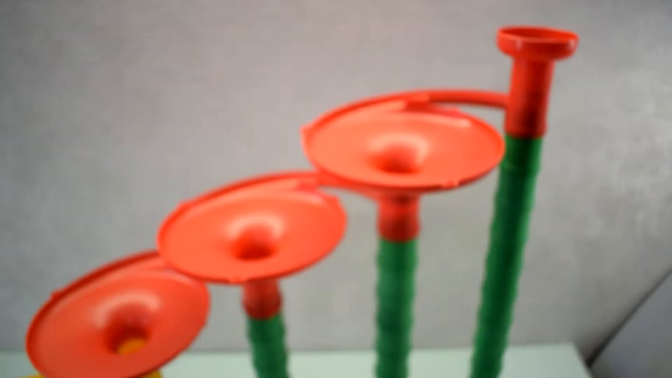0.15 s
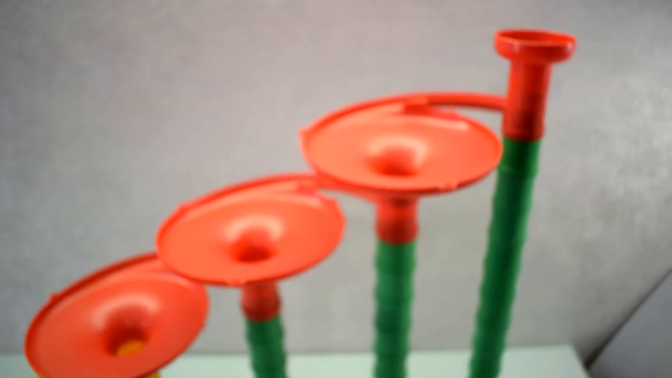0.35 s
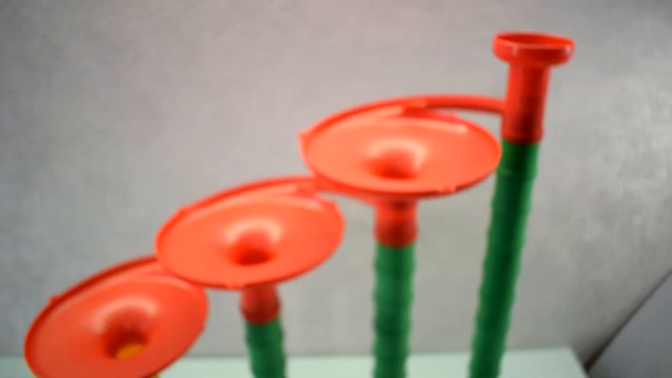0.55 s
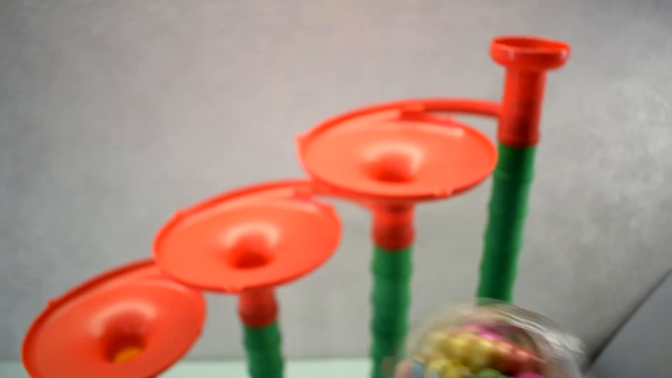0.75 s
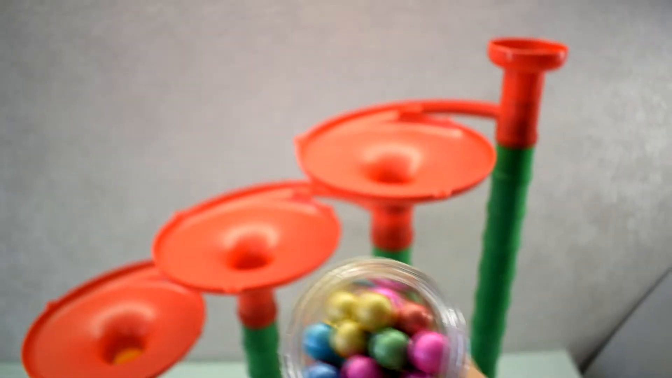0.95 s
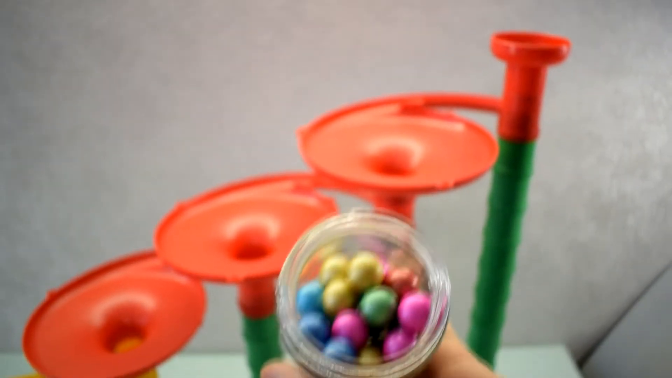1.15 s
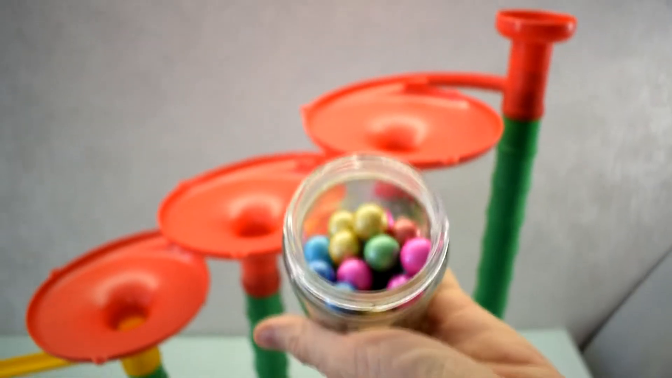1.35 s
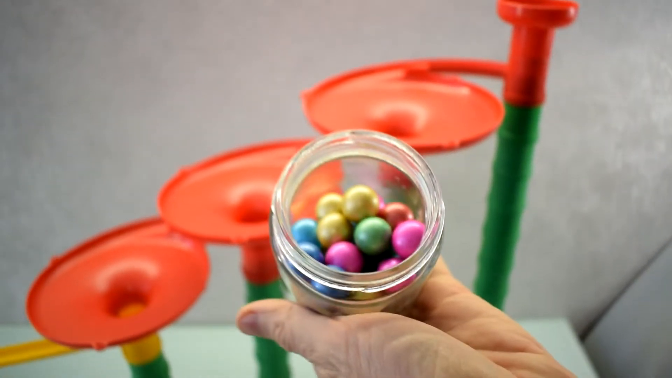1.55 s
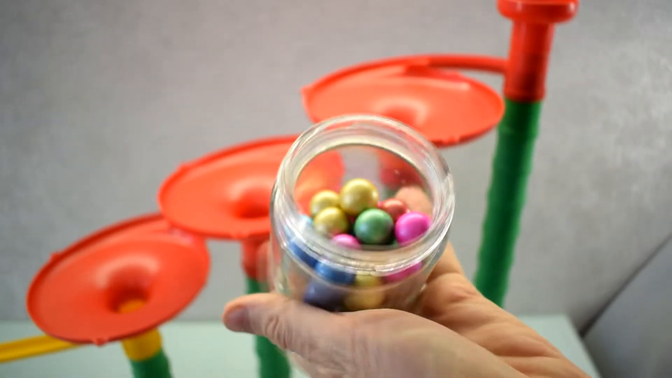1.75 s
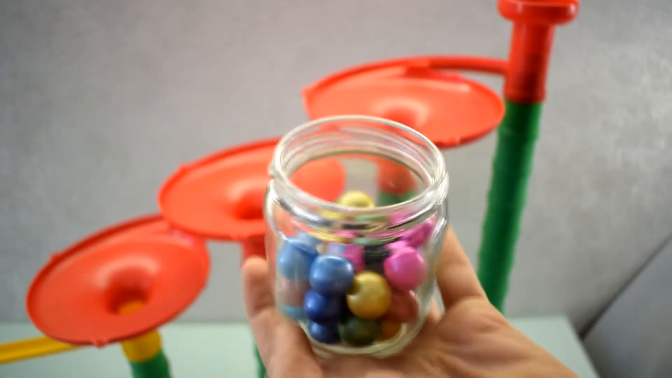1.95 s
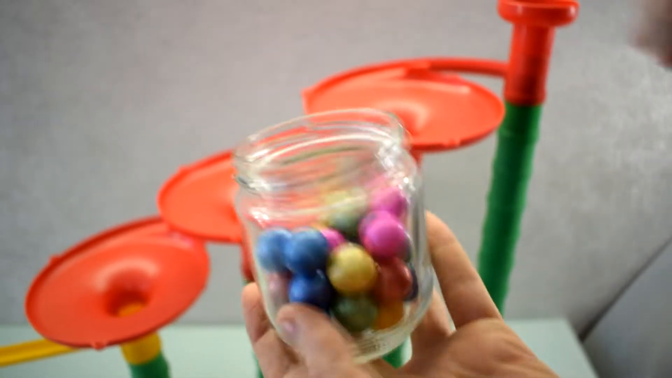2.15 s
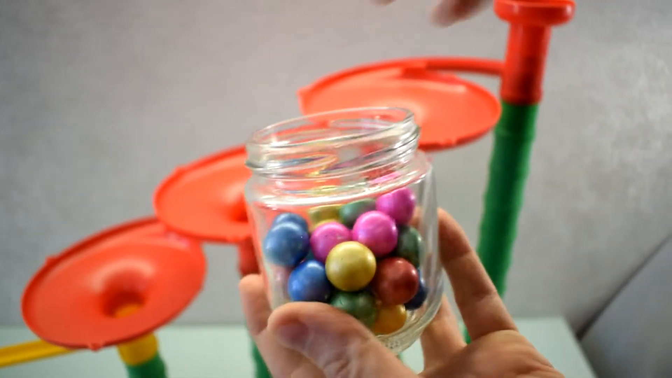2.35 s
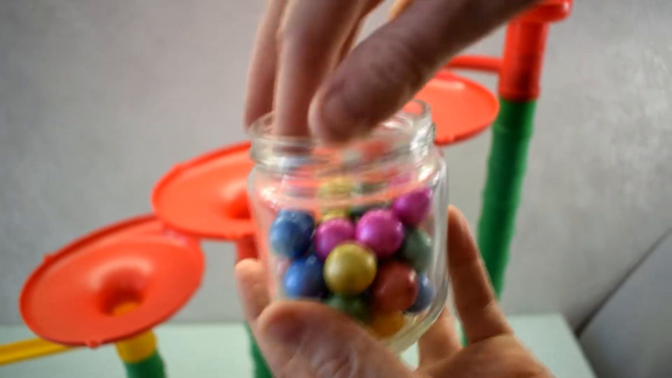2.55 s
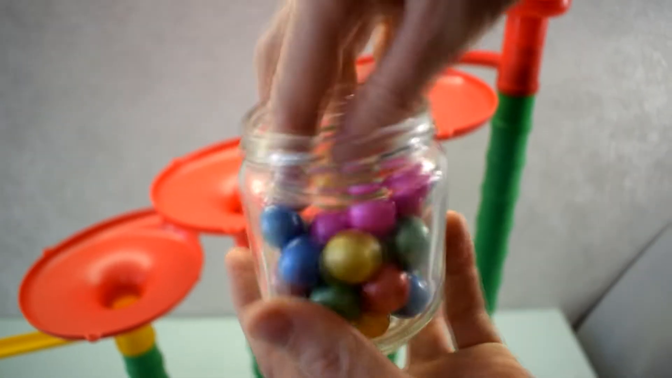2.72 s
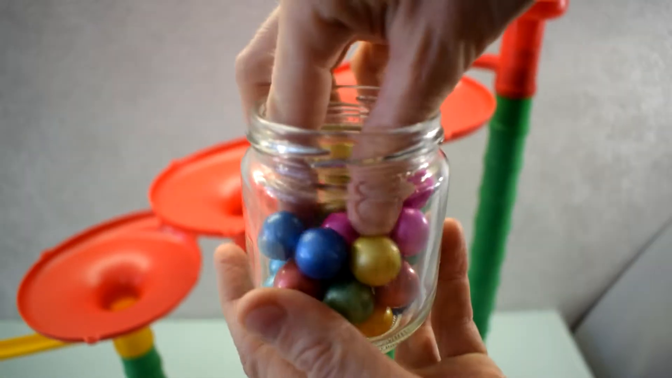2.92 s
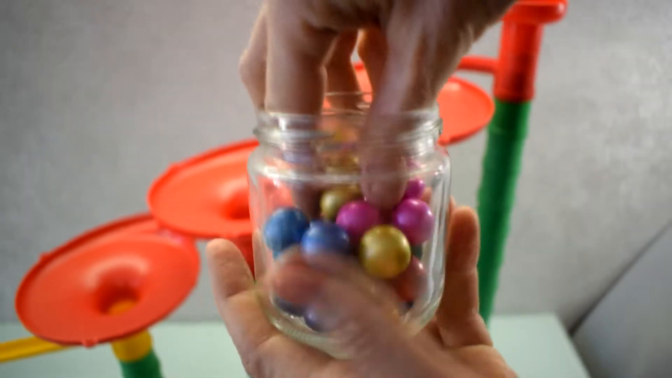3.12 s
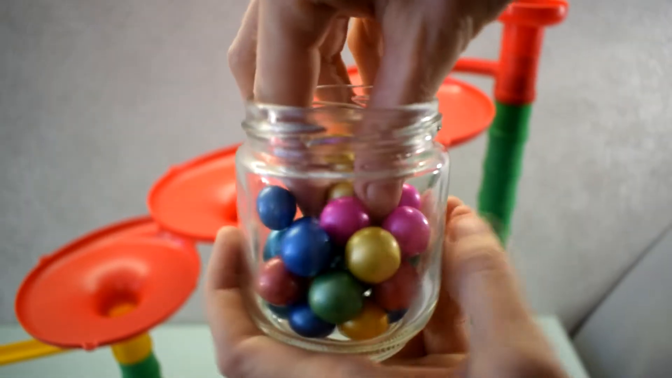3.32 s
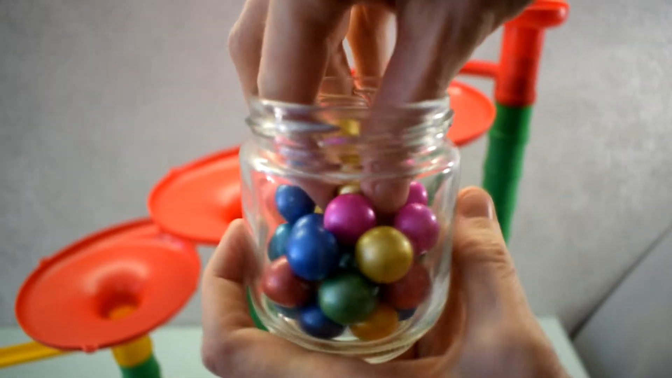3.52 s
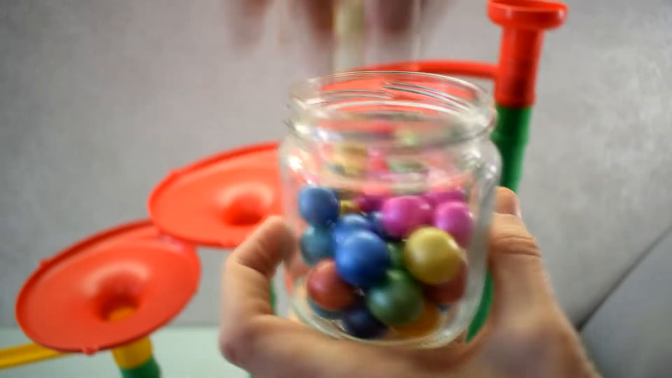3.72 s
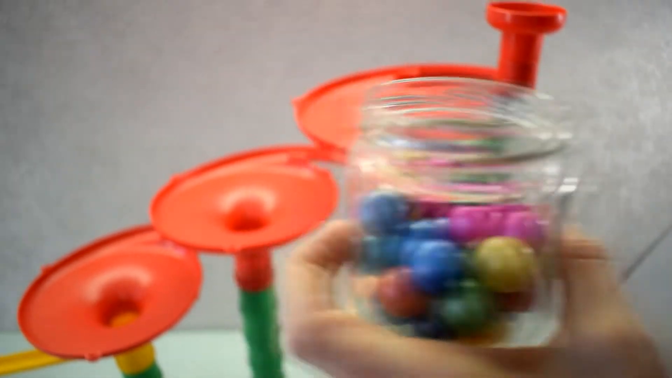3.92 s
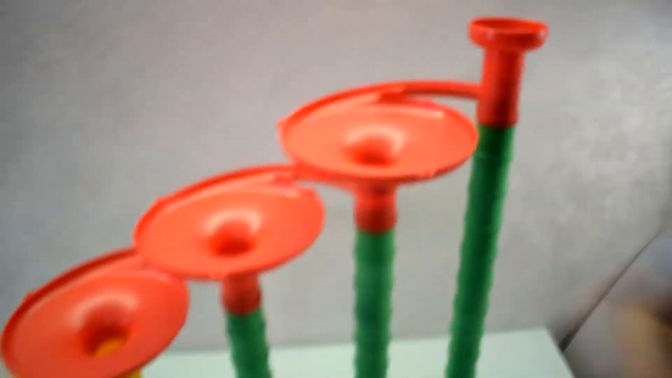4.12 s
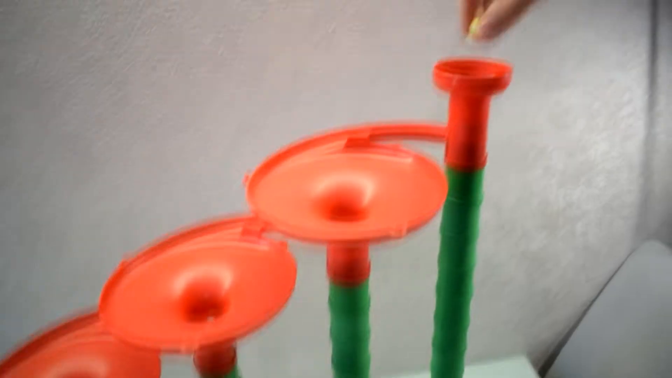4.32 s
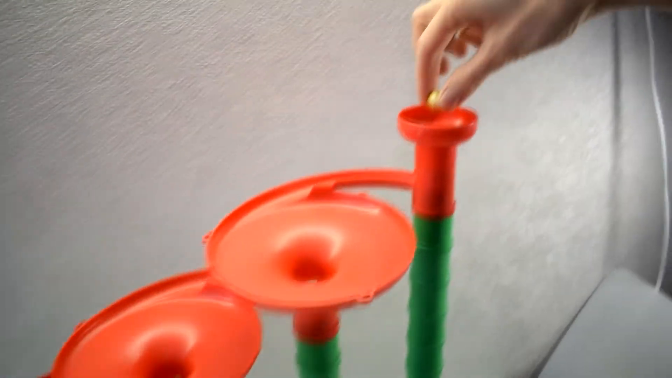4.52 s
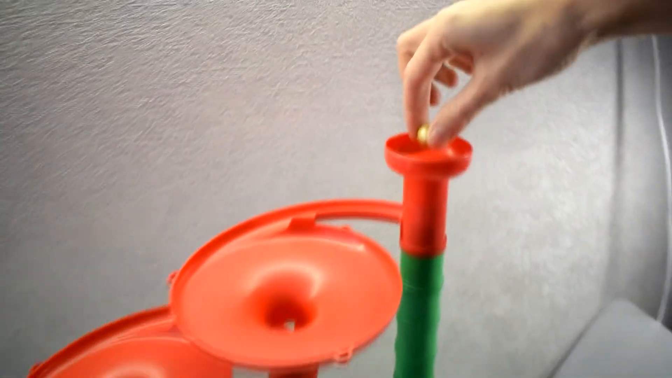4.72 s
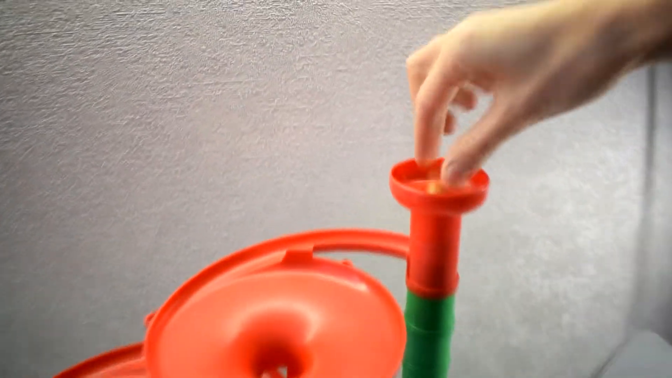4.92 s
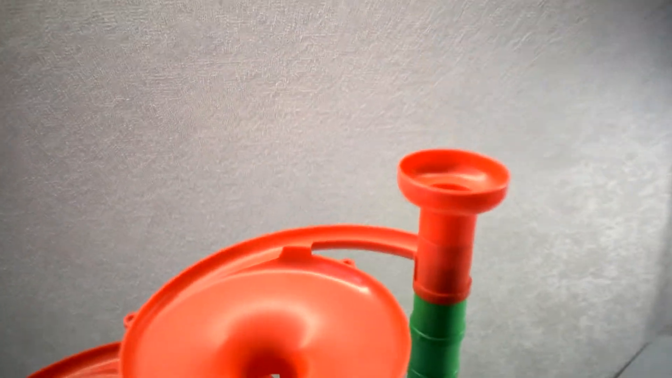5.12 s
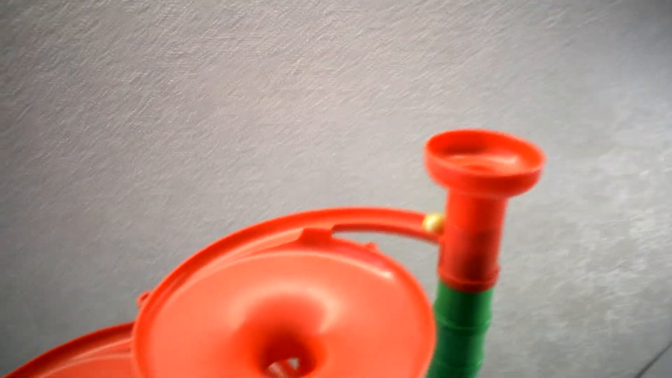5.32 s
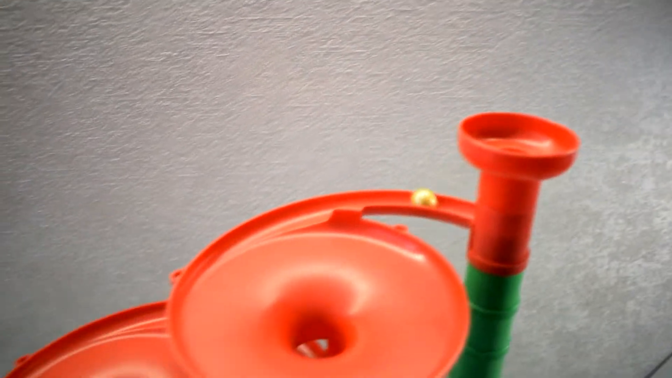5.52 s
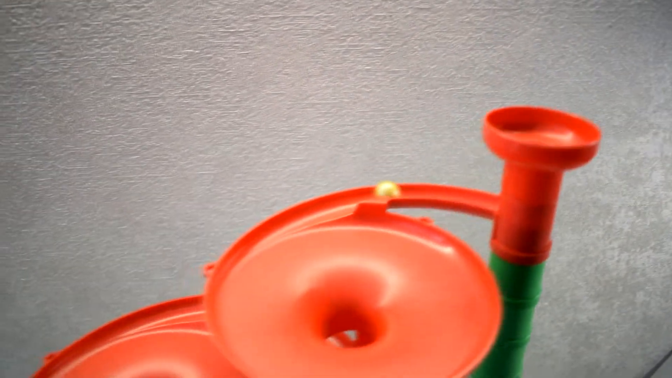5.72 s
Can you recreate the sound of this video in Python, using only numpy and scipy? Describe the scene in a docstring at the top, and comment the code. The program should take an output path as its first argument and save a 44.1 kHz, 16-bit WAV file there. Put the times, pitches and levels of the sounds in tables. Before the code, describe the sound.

Faint room hush, then barely audible marble ticks before a sharp glassy rattle and a louder, denser one as fingers dig in. Irregular clinks continue, then it falls nearly silent with tiny scuffs and cloth rustle. A marble lands in a hollow plastic tower with a loud clack and quick bounces, then rolls quietly and faster. Close stereo microphone, short room echo.

```python
"""Over the steady hush of a small quiet room, filtered noise, a hand lifts a glass jar of marbles and rummages.
The marbles click (noise bursts), ring the glass and sound the air in the jar (damped modes); a funnel hums along.
Dry ticks, a scuff of skin on glass and the brush of a sleeve follow, as noise and impulses shaped by filters.
The chosen marble drops down a plastic tower with a clack (noise bursts and modes of the plastic),
then rolls out along the ramp towards the first funnel: random bumps that excite the resonances of the ramp."""
import sys
import numpy as np
from scipy import signal
from scipy.fft import rfft, irfft, next_fast_len
from scipy.io import wavfile

SR = 44100
rng = np.random.default_rng(int(sys.argv[2]) if len(sys.argv) > 2 else 0)


def materialize(psi):
    """Save the field psi as 16-bit PCM at rate SR to the path in sys.argv[1].

    A 1-D psi becomes a single channel; in a 2-D psi each row is a channel.
    """
    bounded = np.clip(np.atleast_2d(psi).T, -1, 1)
    quanta = np.round(bounded * 32767).astype(np.int16)
    wavfile.write(sys.argv[1], SR, quanta)


N = 254456
TOP_HZ = 15300  # upper edge of the output
TIME = np.arange(N) / SR
RING_TIME = TIME[:SR * 2 // 3]
CRACK_TIME = TIME[:4096]


def undb(db):
    """Amplitude ratio: 20 dB is a factor of ten."""
    return 10 ** (np.asarray(db) / 20)


def unit(x):
    """Normalisation of effective value: rms 1."""
    return x / np.sqrt(np.mean(x ** 2))


def swell(curve):
    """Amplitude envelope: gain interpolated in (time [s], level [dB]), silent outside the rows."""
    s, db = np.transpose(curve)
    return undb(np.interp(TIME, s, db)) * (TIME >= s[0]) * (TIME <= s[-1])


def stroke(s, length, db, rise_db_per_s, fall_db_per_s):
    """Exponential growth and decay: one movement swells up to time s, holds for its length and dies away."""
    before = np.maximum(s - TIME, 0)
    after = np.maximum(TIME - s - length, 0)
    return undb(db - rise_db_per_s * before - fall_db_per_s * after)


def fade(t, t60):
    """Exponential decay: 60 dB down after t60."""
    return np.exp(-np.log(1000) * t / max(t60, 1e-4))


def colour(x, points, tilt_db=0, tilt_hz=1000):
    """Minimum-phase filtering through (frequency [Hz], level [dB]); white noise keeps its power.

    The tilt, in dB per octave, acts above tilt_hz."""
    size = next_fast_len(x.shape[-1], True)
    size += size % 2
    hz, db = np.transpose(points)
    octave = np.log2(np.maximum(np.fft.rfftfreq(size, 1 / SR), 1))
    shape_db = np.interp(octave, np.log2(hz), db)
    shape_db = shape_db + tilt_db * np.maximum(octave - np.log2(tilt_hz), 0)
    gain = unit(undb(shape_db))
    # folding the cepstrum onto positive times makes the filter causal
    cepstrum = irfft(np.log(gain))
    cepstrum[1:size // 2] *= 2
    cepstrum[size // 2 + 1:] = 0
    response = np.exp(rfft(cepstrum))
    return irfft(rfft(x, size) * response)[..., :x.shape[-1]]


def spread(x, width):
    """Level difference between channels: the same sound, with a small random imbalance."""
    side = width * rng.standard_normal()
    return np.array([x * (1 + side), x * (1 - side)])


def noise(size, width):
    """Partial coherence: white stereo noise, more alike on both sides the smaller the width."""
    mid, side = rng.standard_normal((2, size))
    return np.array([mid + width * side, mid - width * side])


def ring(modes, scatter_db, detune, width):
    """Modal superposition: damped (frequency [Hz], level [dB], t60 [s]) sines, weighted anew at each call."""
    out = np.zeros((2, len(RING_TIME)))
    for hz, db, t60 in modes:
        t = RING_TIME[:int(max(t60, .01) * SR)]
        pitch, size, side = rng.standard_normal(3)
        wave = np.sin(2 * np.pi * hz * (1 + detune * pitch) * t) * fade(t, t60)
        gain = np.sign(side) * undb(db + scatter_db * size)
        out[:, :len(t)] += spread(gain * wave, width)
    return out


def crack(t60, tail_db, tail_t60, width):
    """Two-stage decay of a contact: a sharp burst and the short scatter of the parts it shakes."""
    decay = fade(CRACK_TIME, t60) + undb(tail_db) * fade(CRACK_TIME, tail_t60)
    return noise(len(CRACK_TIME), width) * decay


def impacts(per_s, scatter_db):
    """Random point process: impulses of uneven size and either sign, rms 1."""
    sizes = undb(scatter_db * (2 * rng.random(N) - 1)) * np.sign(rng.standard_normal(N))
    return unit((rng.random(N) < per_s / SR) * sizes)


def add(out, s, sound):
    """Linear superposition: mix a sound in at time s."""
    start = int(s * SR)
    out[:, start:start + sound.shape[1]] += sound[:, :max(N - start, 0)]


def sound_through(x, response):
    """Convolution: pass a sound through a stereo impulse response of unit energy per channel on average."""
    response = response / np.sqrt(np.sum(response ** 2) / 2)
    return signal.fftconvolve(x, response, axes=1)[:, :N]


def small_body(x, edge_hz=540):
    """Radiation efficiency: a small object radiates little bass."""
    return signal.sosfilt(signal.butter(2, edge_hz, "high", fs=SR, output="sos"), x)


# spectrum of the room air: (frequency [Hz], relative density [dB])
HUSH_COLOUR = [(18, -46), (30, -23.5), (138, -12.5), (199, -14), (265, -6), (345, -7), (425, -9),
               (583, -4.5), (798, -3.5), (1210, -4.5), (1310, -2.5), (1750, -8.5), (3960, -17),
               (4400, -18.5), (15900, -34.5)]
# level of the room air before stereo shaping: (time [s], level [dB])
HUSH_LEVEL = [(0, -66), (.9, -62.5), (5.77, -61.5)]


def room_hush():
    """Stationary broadband noise: filtered, slowly varying room air."""
    return colour(noise(N, width=0.82), HUSH_COLOUR) * swell(HUSH_LEVEL)


# how far the fingers reach into the jar's mouth: (time [s], share [0-1])
REACH_SHARE = [(2.5, 0.29), (2.65, 0.69), (3.0, 0.82), (3.25, 0.89), (3.7, .75), (3.82, 0.05)]
# the jar open, and with the fingers right in: they lower its note and let it ring longer
OPEN_HZ, OPEN_T60_S, COVERED_HZ, COVERED_T60_S = 1043.6, 0.026, 889.8, .11


def jar_air(s):
    """Cavity resonance: pitch and t60 of the air in the jar at time s, set by the fingers in its mouth."""
    reach = np.clip(np.interp(s, *np.transpose(REACH_SHARE)), 0, 1)
    hz = OPEN_HZ + reach * (COVERED_HZ - OPEN_HZ)
    t60 = OPEN_T60_S + reach * (COVERED_T60_S - OPEN_T60_S)
    return hz, t60


# the clearer knocks of the marbles; those lying against the glass shift and damp its ring:
# (time [s], relative force [dB], relative wall ring [dB], nominal ring pitch [Hz], ring t60 [s])
JAR_KNOCKS = [(1.119, -42.5, -38.5, 4296, 0.04), (1.144, -51, -56.5, 4340, 0.2),
              (1.229, -56, -54, 4390, 0.11), (1.287, -49.5, -53.5, 4280, 0.064),
              (1.901, -47.5, -45, 4220, 0.047), (1.963, -57.5, -50.5, 4310, 0.081),
              (1.971, -47.5, -48, 4250, 0.077), (2.137, -48.5, -33.5, 4230, 0.13),
              (2.172, -45.5, -47, 4230, 0.072), (2.233, -42, -40.5, 4227, 0.033),
              (2.255, -25, -18.5, 4196, .06), (2.264, -28, -21, 4230, 0.03),
              (2.273, -21.5, -22.5, 4170, 0.13), (2.281, -32.5, -9, 4225, 0.041),
              (2.294, -32, -16.5, 4153, .04), (2.3, -25.5, -24, 4450, 0.081),
              (2.309, -25.5, -9.5, 4255, 0.056), (2.341, -29.5, -24, 4360, 0.082),
              (2.361, -41.5, -23.5, 4270, 0.086), (2.498, -36, -21, 4255, 0.095),
              (2.621, -47, -24, 4290, 0.034), (2.647, -45.5, -32.5, 4260, 0.064),
              (2.76, -21, -17, 4320, 0.029), (2.774, -36, -13, 4284, 0.036),
              (2.793, -22.5, -18.5, 4240, 0.041), (2.809, -25.5, -4, 4370, 0.025),
              (2.819, -19.5, -18, 4250, 0.1), (2.833, -13.5, -13.5, 4404, 0.08),
              (2.85, -24.5, -1.5, 4316, 0.017), (2.857, -35.5, -12, 4257, .12),
              (2.897, -30.5, -21, 4376, .07), (2.932, -37.5, -35, 4260, 0.042),
              (2.975, -32, -25, 4300, 0.04), (2.993, -34.5, -26.5, 4310, 0.065),
              (3.012, -32, -37, 4400, 0.024), (3.025, -41.5, -31.5, 4510, 0.071),
              (3.062, -43, -27, 4560, 0.016), (3.093, -39.5, -53, 4260, 0.13),
              (3.111, -32.5, -37, 4340, 0.16), (3.139, -32.5, -29, 4345, 0.13),
              (3.149, -35, -20.5, 4520, 0.022), (3.163, -20, -6, 4416, 0.029),
              (3.19, -44, -14.5, 4180, 0.027), (3.208, -29, -24.5, 4060, 0.051),
              (3.215, -25.5, -23, 4490, 0.052), (3.229, -24, -14, 4310, 0.033),
              (3.244, -37, -16, 4240, 0.019), (3.253, -29, -31.5, 4200, .08),
              (3.348, -41, -31, 4360, 0.037), (3.362, -43.5, -46, 4240, 0.052),
              (3.462, -43, -18.5, 4410, 0.019), (3.53, -34.5, -33, 4300, 0.036),
              (3.614, -27, -28, 4200, 0.022), (3.623, -47, -28, 4290, 0.11),
              (3.648, -33.5, -28.5, 4280, 0.074), (3.698, -22.5, -20.5, 4190, 0.032),
              (3.749, -36.5, -34.5, 4290, 0.043), (3.789, -46, -17.5, 4360, 0.031),
              (3.799, -32.5, -26, 4260, 0.11), (3.807, -30, -18, 4253, 0.062),
              (3.82, -24.5, -24.5, 4340, 0.076), (3.854, -43, -45, 4220, 0.23),
              (4.077, -38, -40.5, 4205, 0.081), (4.085, -44, -41, 4250, 0.1),
              (4.162, -48, -34, 4275, 0.047), (4.328, -48.5, -56, 4240, .06),
              (4.339, -48.5, -37, 4240, 0.035), (5.696, -36, -25.5, 4313, 0.12)]
# glass modes next to the main ring: (frequency [Hz], relative level [dB], t60 [multiple of the ring's])
GLASS_MODES = [(3660, -15.5, 1.0), (4210, -16.5, 1.1), (4175, -13.5, 1.2), (4370, -17.5, 1.3),
               (4390, -17, 1.0), (4500, -23, 1.0), (4850, -17.5, 1.2), (5250, -27, 1.0)]
# higher glass modes: (frequency [Hz], relative level [dB], t60 [multiple, further damped in a knock])
GLASS_OVERTONES = [(10035, -6, 1.0), (10148, -3, 1.2), (10213, -5, 1.2), (12280, -11, .9),
                   (13420, -21, 1.0), (13680, -16, 1.2), (14480, -16, .9)]
# spectrum of glass on glass: (frequency [Hz], relative level [dB])
GLASS_CLICK_COLOUR = [(40, -47), (150, -40), (300, -25.5), (500, -36), (750, 4), (1150, 3), (1900, 2),
                      (2600, 7.5), (3500, 0), (4700, 1), (6500, -1), (9000, -2.5), (11500, -13),
                      (14500, -23), (16000, -31)]
# a harder knock is a shorter contact: its click is brighter
NEUTRAL_FORCE_DB, TILT_DB_PER_OCTAVE_PER_DB, BRIGHTEST_TILT_DB = -29.5, .5, 3
OVERTONE_GROWTH = 1.966  # dB of overtones per dB of ring: they grow faster than the main ring
OVERTONE_T60_SHARE = 0.79  # the marbles damp the overtones sooner than the main ring
RING_RISE_S = 0.00083  # time constant: the ring takes a moment to spread round the wall
AIR_GROWTH = 0.81  # dB of the air's note per dB of force: even soft knocks sound it
AIR_LOSS = 0.53  # dB that the air's note loses per dB by which a knock favours the wall


def clinks(click_db=6.0, wall_db=5.0, overtone_db=8, air_db=-0.5, neighbours_db=-7):
    """Impact excitation: each knock clicks, rings the loaded, damped glass and sounds the air inside."""
    out = np.zeros((2, N))
    rise = 1 - np.exp(-RING_TIME / RING_RISE_S)
    for s, force_db, ring_db, ring_hz, t60 in JAR_KNOCKS:
        contact = crack(t60=0.0036, tail_db=-4, tail_t60=0.064, width=0.41)
        tilt_db = min(TILT_DB_PER_OCTAVE_PER_DB * (force_db - NEUTRAL_FORCE_DB), BRIGHTEST_TILT_DB)
        click = colour(contact, GLASS_CLICK_COLOUR, tilt_db, tilt_hz=1850)
        add(out, s, undb(force_db + click_db) * click)

        neighbours = [(hz, db + neighbours_db, share * t60) for hz, db, share in GLASS_MODES]
        wall = ring([(ring_hz, 0, t60)] + neighbours, scatter_db=-3, detune=0.0012, width=0.39)
        add(out, s, undb(ring_db + wall_db) * rise * wall)

        high_modes = [(hz, db, OVERTONE_T60_SHARE * share * t60) for hz, db, share in GLASS_OVERTONES]
        overtones = ring(high_modes, scatter_db=3.5, detune=0.0063, width=0.4)
        add(out, s, undb(OVERTONE_GROWTH * ring_db + overtone_db) * rise * overtones)

        air_hz, air_t60 = jar_air(s)
        note_db = AIR_GROWTH * force_db - AIR_LOSS * (ring_db - force_db) + air_db
        note = ring([(air_hz, 0, air_t60)], scatter_db=-2.0, detune=0.014, width=0.24)
        add(out, s, undb(note_db) * note)
    return out


# the nearest funnel's resonance: (frequency [Hz], relative level [dB], t60 [s])
FUNNEL_MODE = [(324.6, 0, 0.69)]


def sympathy(jar, hum_db=-25):
    """Sympathetic resonance: the rattle of the jar sets a funnel humming faintly."""
    return undb(hum_db) * sound_through(jar, ring(FUNNEL_MODE, scatter_db=0, detune=0, width=0))


# stirs of the fingers that set the marbles churning: (time [s], length [s], relative level [dB])
FINGER_STIRS = [(2.27, 0.065, -30.5), (2.763, .075, -16.5), (2.987, 0.007, -43), (3.124, .005, -32.5),
                (3.152, 0.053, -35.5), (3.623, 0.0023, -44.5), (3.698, 0.0037, -38), (3.793, 0.023, -39.5)]
STIR_RISE_DB_PER_S, SETTLE_DB_PER_S = 4000, 300.5


def churn(click_db=-1, wall_db=-1, overtone_db=-5, air_db=-6):
    """Stochastic excitation: many small contacts between the larger knocks drive the same jar."""
    grains = impacts(per_s=700, scatter_db=5)
    stirs = [stroke(*row, STIR_RISE_DB_PER_S, SETTLE_DB_PER_S) for row in FINGER_STIRS]
    contacts = grains * sum(stirs)
    contact = crack(t60=0.0041, tail_db=-9.5, tail_t60=0.028, width=0.24)
    click = colour(contact, GLASS_CLICK_COLOUR, tilt_db=0.0)
    out = undb(click_db) * sound_through(contacts[None], click)
    for db, modes in [(wall_db, GLASS_MODES), (overtone_db, GLASS_OVERTONES)]:
        damped = [(hz, size, share * 0.098) for hz, size, share in modes]  # main ring t60 0.098 s
        glass = ring(damped, scatter_db=7.5, detune=0.00065, width=0.12)
        out = out + undb(db) * sound_through(contacts[None], glass)
    # the air note depends on how deep the fingers are during each stir
    for (s, length, _), stir in zip(FINGER_STIRS, stirs):
        air_hz, air_t60 = jar_air(s + length / 2)
        cavity = ring([(air_hz, 0, air_t60)], scatter_db=0, detune=0, width=0)
        out = out + undb(air_db) * sound_through((grains * stir)[None], cavity)
    return out


# dry ticks right by the microphone: (time [s], relative level [dB])
DRY_TICKS = [(3.974, -20.5), (4.302, -47.5), (5.343, -27)]
# spectrum of a tick: (frequency [Hz], relative level [dB])
DRY_TICK_COLOUR = [(200, -48), (1100, -1.5), (1500, -9.5), (2000, 0.5), (2700, 0.5), (3600, -0.5),
                   (4400, -11), (7200, -22), (10000, -32), (16000, -44)]


def ticks():
    """Direct sound of short noise bursts, too close to wake the room."""
    out = np.zeros((2, N))
    for s, db in DRY_TICKS:
        add(out, s, undb(db) * crack(t60=0.005, tail_db=-7.0, tail_t60=0.031, width=0.85))
    return colour(out, DRY_TICK_COLOUR)


# fingers scuff the glass as the jar is put aside: (time [s], length [s], relative level [dB])
SKIN_SCUFFS = [(4.04, 0.0061, -60.5), (4.07, .006, -46), (4.134, 0.12, -63.5), (4.297, 0.04, -52)]
# spectrum of skin on glass: (frequency [Hz], relative level [dB])
SKIN_COLOUR = [(200, -6.5), (500, 2), (750, 14.5), (1200, 10), (2600, -8), (3700, 12), (4600, -9),
               (9000, -26), (16000, -39)]
SCUFF_RISE_DB_PER_S, SCUFF_FALL_DB_PER_S = 700, 600


def scuffs():
    """Stick-slip friction: skin catches and slips on the glass in tiny steps, drawn as random impulses."""
    rubbing = sum(stroke(*row, SCUFF_RISE_DB_PER_S, SCUFF_FALL_DB_PER_S) for row in SKIN_SCUFFS)
    return colour(impacts(per_s=8400, scatter_db=10) * rubbing, SKIN_COLOUR)


# a sleeve brushes as the arm reaches up: (time [s], length [s], level [dB])
SLEEVE_BRUSHES = [(4.447, 0.0147, -60.5), (4.652, .02, -55)]
# spectrum of the rustle: (frequency [Hz], relative level [dB])
RUSTLE_COLOUR = [(300, -10), (2000, 3), (4000, -5.5), (9000, -7), (12000, -14), (16000, -30)]
BRUSH_RISE_DB_PER_S, BRUSH_FALL_DB_PER_S = 224.5, 170


def sleeve_rustle():
    """Friction noise of cloth: filtered noise under the envelope of each brush."""
    brushing = sum(stroke(*row, BRUSH_RISE_DB_PER_S, BRUSH_FALL_DB_PER_S) for row in SLEEVE_BRUSHES)
    return colour(noise(N, width=0.86), RUSTLE_COLOUR) * brushing


# blows on the plastic track: (time [s], relative level [dB], treble tilt [dB per octave])
TRACK_BLOWS = [(4.59, -42, -21.5), (4.609, -48.5, -14.5), (5.026, -9, 0), (5.0315, -6, 3.5),
               (5.062, -15, -2), (5.077, -22, 1), (5.273, -36, -0.5), (5.454, -54, -18),
               (5.533, -41.5, -12), (5.54, -39, -8), (5.568, -46, -9), (5.635, -45.5, -9),
               (5.686, -40, -3.5)]
# modes of tower and funnel, the lowest a thud into the table: (frequency [Hz], relative level [dB], t60 [s])
PLASTIC_MODES = [(84, 0.5, 0.016), (202, -24, 0.15), (312.5, -18.5, 1), (392, -24, 1), (486.2, -3.5, 0.27),
                 (977, -8, 0.19), (1191, -5.5, 0.3), (1340, -3, 0.14), (1690, -16, 0.088), (1810, -8, 0.14),
                 (1915, -4, 0.23), (2182, -19, 0.13), (2430, -21, .14), (2534, -9, 0.054), (2830, -23, 0.1),
                 (3110, -4, 0.038), (3280, -14, 0.1)]
# the dense, short ring of the plastic: (frequency [Hz], relative level [dB])
DENSE_PLASTIC_COLOUR = [(30, -49), (150, -23), (400, -21), (800, -6), (1300, 0.5), (2200, 2.5), (3200, -3),
                        (4500, -11.5), (8000, -16), (12000, -30), (16000, -40)]


def track_knocks(modes_db=-15, edge_hz=6000):
    """Impact on a modal body: a finger touches the tower; the marble lands in it, bounces, bumps onto the ramp."""
    out = np.zeros((2, N))
    body = undb(modes_db) * ring(PLASTIC_MODES, scatter_db=0.5, detune=0.00084, width=0.12)
    for s, db, tilt_db in TRACK_BLOWS:
        blow = crack(t60=0.026, tail_db=-12.5, tail_t60=0.09, width=0.57)
        add(out, s, undb(db) * colour(blow, DENSE_PLASTIC_COLOUR, tilt_db, tilt_hz=610))
        # a dull blow leaves the high modes asleep
        softness_hz = min(edge_hz * undb(tilt_db), TOP_HZ)
        softness = signal.butter(2, softness_hz, fs=SR, output="sos")
        add(out, s, undb(db) * signal.sosfilt(softness, body))
    return out


# the rumble of the marble on the ramp: (frequency [Hz], relative level [dB])
RUMBLE_COLOUR = [(80, -42), (200, 7), (380, 14), (550, 3.5), (750, 21.5), (950, -1), (1220, 7.5),
                 (1800, -5), (3000, -3.5), (5000, -19), (10000, -27), (16000, -59)]
# resonances of the ramp: (frequency [Hz], relative level [dB], t60 [s])
RAMP_RESONANCES = [(400.4, -10.5, 0.24), (776, -9, 0.044), (1203, 3, 0.054), (1608, -4, 0.063),
                   (2266, -5, .02), (2940, -19, 0.02)]
# the marble creeps out of the tower, then gathers speed evenly down the ramp
ROLL_STARTS_S, RAMP_STARTS_S = 5.2, 5.435
CREEP_M_PER_S, RAMP_M_PER_S2 = 0.044, 0.83
BUMPS_DB = -31  # drive at 1 m/s, ahead of the rumble and the resonances


def rolling(grain_db=-3, modes_db=-3):
    """Roughness excitation: tiny bumps shake the plastic in proportion to the marble's speed."""
    ramp_speed = RAMP_M_PER_S2 * np.maximum(TIME - RAMP_STARTS_S, 0)
    speed = (TIME >= ROLL_STARTS_S) * (CREEP_M_PER_S + ramp_speed)
    bumps = impacts(per_s=260, scatter_db=9) * speed * undb(BUMPS_DB)
    resonances = ring(RAMP_RESONANCES, scatter_db=0.5, detune=0.0009, width=0.095)
    body = undb(modes_db) * sound_through(bumps[None], resonances)
    rumble = undb(grain_db) * colour(bumps, RUMBLE_COLOUR)
    return small_body(rumble + body, edge_hz=120)


# the room's echo: (frequency [Hz], relative level [dB], t60 [s])
ROOM_DECAY = [(100, -11.5, 0.53), (430, 1, 0.64), (930, 5, 0.41), (2560, 1.5, 0.42), (4970, -1.5, 0.42),
              (10100, 3, 0.25), (16000, -13.5, 0.35)]


def room(x, echo_db, width, gap_s=0.0013):
    """Diffuse reverberation: noise decays at a rate of its own in each band, after a short initial gap."""
    t = RING_TIME
    octave = np.log2(np.maximum(np.fft.rfftfreq(len(t), 1 / SR), 1))
    spectrum = rfft(noise(len(t), width))
    centres = np.log2([row[0] for row in ROOM_DECAY])
    echo = 0
    for (hz, db, t60), band in zip(ROOM_DECAY, np.eye(len(ROOM_DECAY))):
        band_noise = irfft(spectrum * np.interp(octave, centres, band), len(t))
        echo = echo + undb(db) * band_noise * fade(t, t60)
    onset = np.clip(t / gap_s - 1, 0, 1)
    return undb(echo_db) * sound_through(x, echo * onset)


def ports(x, apart):
    """Spatial coherence: two microphone ports close together, the side signal scaled by frequency."""
    mid, side = (x[0] + x[1]) / 2, (x[0] - x[1]) / 2
    size = next_fast_len(N, True)
    hz, db = np.transpose(apart)
    log_hz = np.log(np.maximum(np.fft.rfftfreq(size, 1 / SR), 1))
    gain = undb(np.interp(log_hz, np.log(hz), db))
    side = irfft(rfft(side, size) * gain, size)[:N]
    return np.array([mid + side, mid - side])


# gain of the left-right difference for the objects: (frequency [Hz], gain [dB])
OBJECTS_APART = [(100, -13), (500, -34.5), (1000, -46), (2000, -18.5), (4000, -6), (8000, -6.5),
                 (16000, 2.5)]
# the same for the room air: (frequency [Hz], gain [dB])
HUSH_APART = [(60, -9), (110, -3.5), (200, -5.5), (380, 1), (700, -2.5), (1290, -4.5), (2380, 0.5),
              (4400, 0.5), (8120, 0.5), (15000, 3)]


def scene():
    """Superposition of fields: jar close by, track a little further off, over the hush of the room."""
    hush = room_hush()
    jar = small_body(clinks() + churn() + scuffs())
    track = track_knocks() + rolling() + sympathy(jar)
    echoes = room(jar, echo_db=-10.5, width=0.71) + room(track, echo_db=-7.5, width=0.65)
    objects = jar + track + echoes + ticks() + sleeve_rustle()
    return ports(objects, OBJECTS_APART) + ports(hush, HUSH_APART)


def record(dry, lopsided=0.047):
    """Asymmetric saturation: loud peaks are rounded unevenly, adding a low thump; then the top is cut."""
    ceiling = .88
    rounded = ceiling * np.tanh(dry / ceiling)
    rounded = rounded + lopsided * rounded ** 4
    rounded = signal.sosfilt(signal.butter(2, 30, "high", fs=SR, output="sos"), rounded)
    return signal.sosfilt(signal.ellip(8, .2, 80, TOP_HZ, fs=SR, output="sos"), rounded)


dry = scene()
out = record(dry)
materialize(out)
```